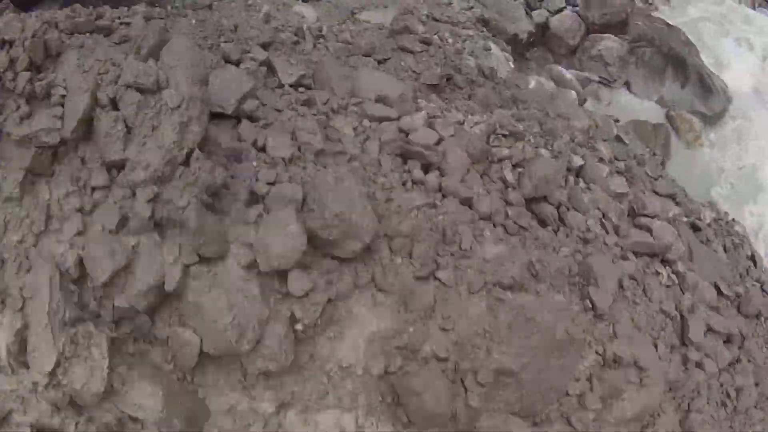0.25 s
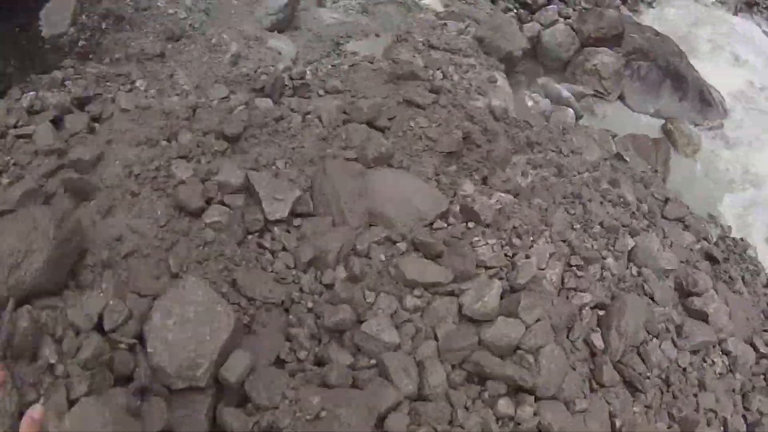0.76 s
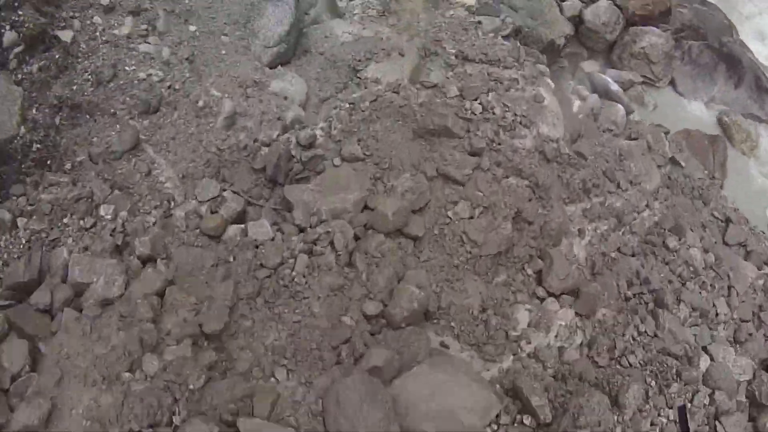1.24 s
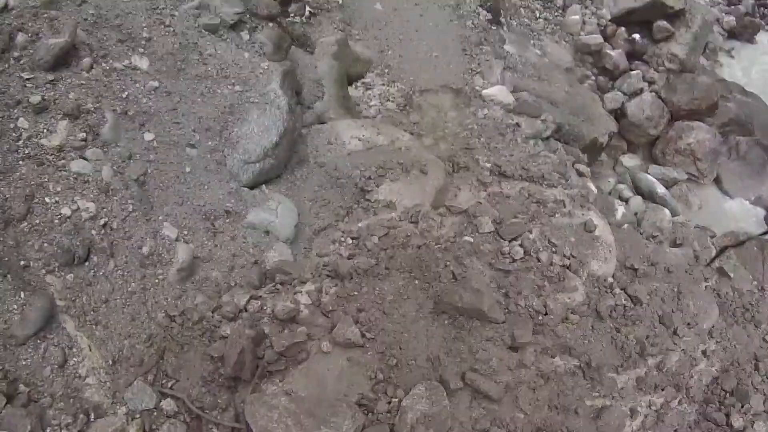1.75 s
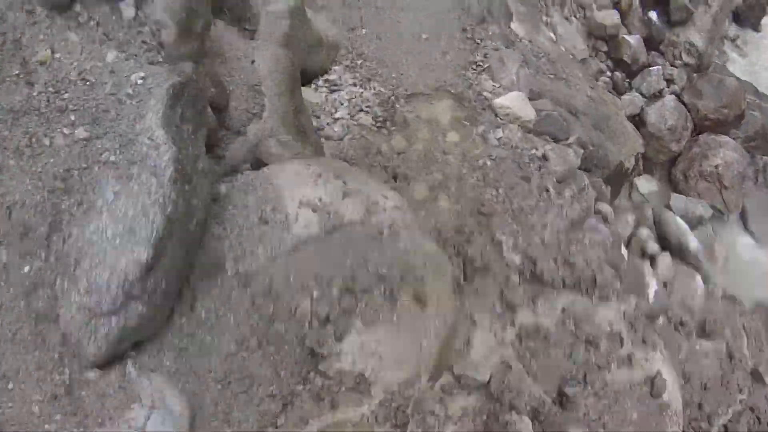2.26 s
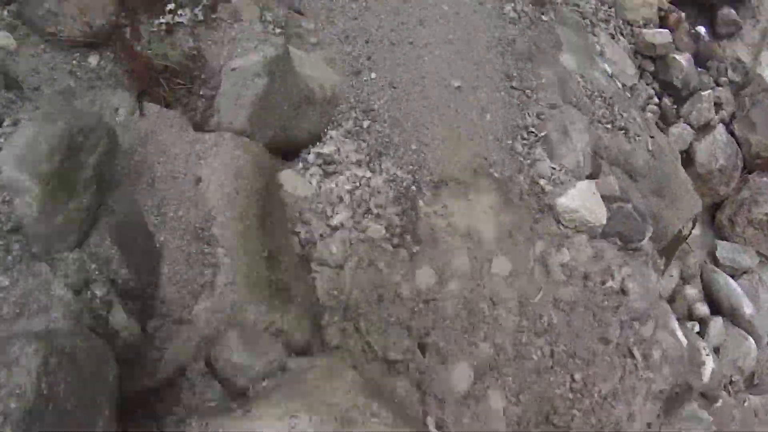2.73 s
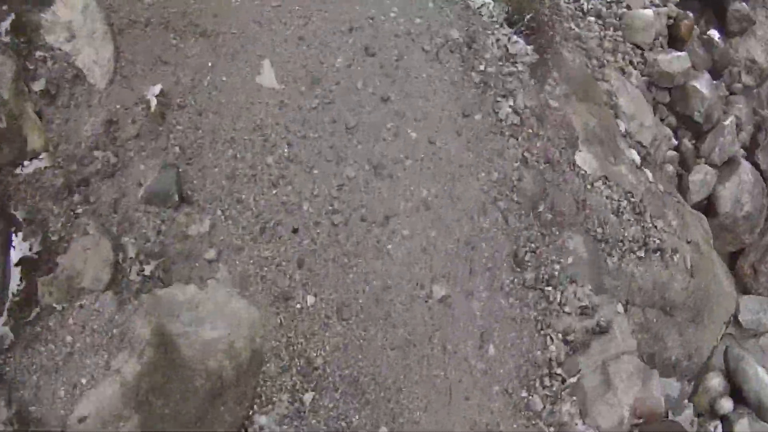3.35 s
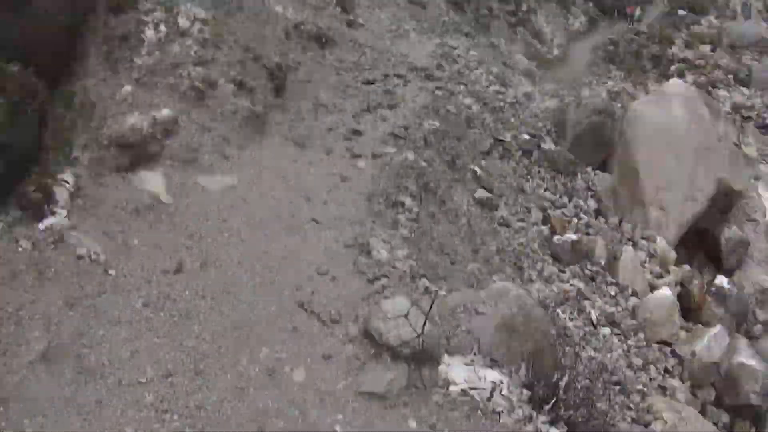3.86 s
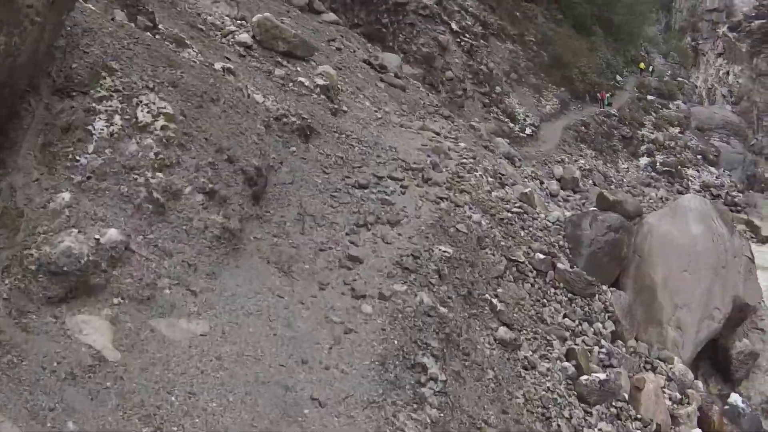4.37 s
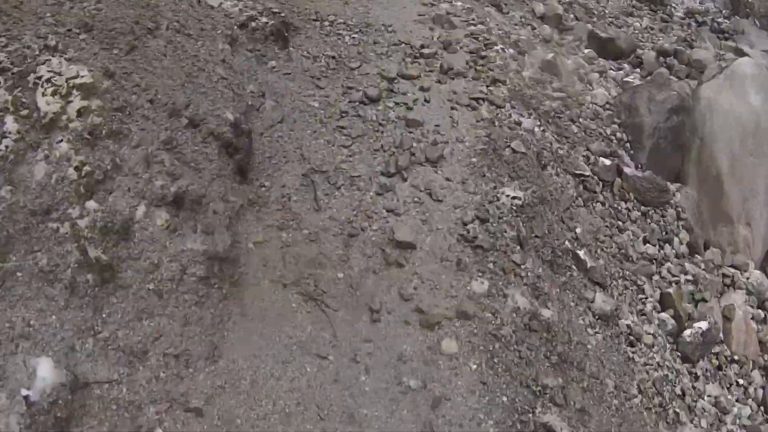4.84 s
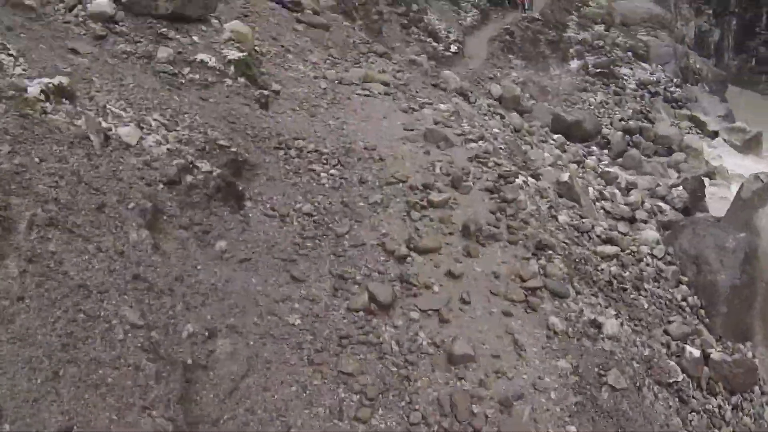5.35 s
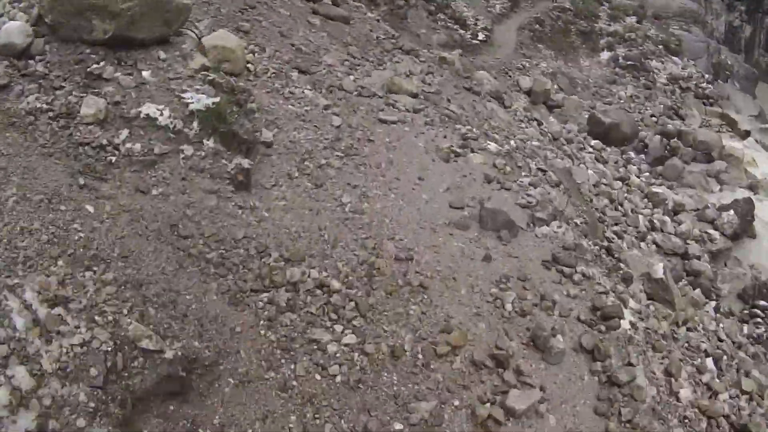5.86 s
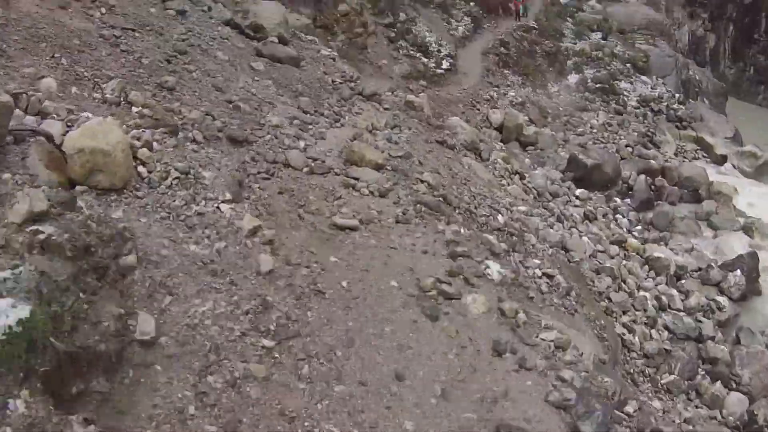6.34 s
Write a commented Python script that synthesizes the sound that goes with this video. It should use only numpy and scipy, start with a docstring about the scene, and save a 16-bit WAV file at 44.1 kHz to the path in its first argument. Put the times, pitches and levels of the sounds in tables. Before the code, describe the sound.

Boots crunch over loose scree beside a steadily rushing river, while a body-worn camera rumbles, thumps and clacks hard with the jolting stride.

```python
"""Walking on scree above a river

A walker crosses loose scree above a rushing river, with a small cased camera worn on the body.
The river is coloured noise with splashes; steps are showers of tiny gravel impacts, and stones ring and crack.
The stride jolts the camera: it rumbles, thumps with low pulses, thuds dully and clacks in its mount.
The hardest jolts, in two groups, drive the limiter, so the river ducks and swells back."""
import sys
import numpy as np
from scipy import signal
from scipy.fft import rfft, irfft
from scipy.io import wavfile
from scipy.ndimage import uniform_filter1d, minimum_filter1d

SR = 44100
rng = np.random.default_rng(int(sys.argv[2]) if len(sys.argv) > 2 else 0)


def master(y):
    """Save y as 16-bit WAV."""
    cut = np.clip(np.atleast_2d(y).T, -1, 1)
    pcm = np.round(cut * 32767)  # scale
    wavfile.write(sys.argv[1], SR, pcm.astype(np.int16))


N = 291060
TIME = np.arange(N) / SR


def undb(db):
    """Turn decibels into a gain."""
    return 10 ** (np.asarray(db) / 20)


def unit(x):
    """Scale to an rms of one."""
    return x / np.sqrt(np.mean(x ** 2))


def peaked(x):
    """Scale to a peak of one."""
    return x / np.max(np.abs(x))


def add(out, s, sound):
    """Mix a sound in at time s (seconds)."""
    start = int(np.clip(s * SR, 0, N - 1))
    out[start:start + len(sound)] += sound[:N - start]


def colour(x, points):
    """Filter through (Hz, dB) points without sounding early; white noise keeps its power."""
    size = 16384
    hz, db = np.transpose(points)
    bins_hz = np.fft.rfftfreq(size, 1 / SR)
    log_gain = np.log(undb(np.interp(np.log(bins_hz + 1), np.log(hz), db)))
    # fold the cepstrum: all of the filter's response then comes after its input
    cepstrum = irfft(log_gain)
    cepstrum[1:size // 2] *= 2
    cepstrum[size // 2 + 1:] = 0
    response = irfft(np.exp(rfft(cepstrum)))
    return signal.fftconvolve(x, response / np.linalg.norm(response))[:len(x)]


def walk(rate):
    """Wander at random with an rms of one: rate new levels a second, smoothed twice."""
    k = int(SR / rate)
    steps = np.repeat(rng.standard_normal(N // k + 1), k)
    return unit(uniform_filter1d(uniform_filter1d(steps, k), k)[:N])


def grains(rate, spread_db):
    """Scatter tiny impacts at random, rate a second, mostly small and a few large."""
    chance, sign = rng.random(N), rng.choice([-1, 1], N)
    size = undb(spread_db * np.minimum(rng.exponential(size=N), 4))
    return unit((chance < rate / SR) * sign * size)


def swells(table):
    """Level of bell-shaped bursts given as (middle s, length s, dB), added as powers."""
    power = 0
    for s, length, db in table:
        power = power + undb(db) ** 2 * np.exp(-np.pi * ((TIME - s) / length * np.sqrt(2)) ** 2)
    return np.sqrt(power)


def after_jolts(growth, build_s, fall_s):
    """Level of something stirred by the jolts: it builds up to each one, then dies away."""
    power = 0
    for s, db, _ in JOLTS:
        shape = np.exp(-2 * np.maximum((s - TIME) / build_s, (TIME - s) / fall_s))
        power = power + undb(growth * db) ** 2 * shape
    return np.sqrt(power)


def fade(t60, rise_s):
    """Envelope of a blow: it builds while the contact lasts, then dies away."""
    t = TIME[:SR // 10]
    return peaked((1 - np.exp(-(t / rise_s) ** 2)) * np.exp(-np.log(1000) * t / t60))


def ring(hz, t60, rise_s):
    """One struck tone: a sine that dies away."""
    envelope = fade(t60, rise_s)
    return np.sin(2 * np.pi * hz * TIME[:len(envelope)]) * envelope


def burst(t60, rise_s):
    """Noise that dies away like a blow."""
    envelope = fade(t60, rise_s)
    return rng.standard_normal(len(envelope)) * envelope


# spectrum of the river: f/Hz, relative level/dB per Hz
RIVER_COLOUR = [(60, 8), (200, -3.5), (450, -5.5), (850, -8.5), (1150, -10), (1400, -1.5), (1650, -3),
                (2050, 3.5), (2850, 5.5), (3300, -5), (3950, -7.5), (4450, -7), (7000, -16), (7900, -21),
                (15000, -31.5)]
# the path leads slowly away from the white water: level at the start (dB), its fall (dB per s)
RIVER_DB, RECEDE_DB_PER_S = -46.5, 0.31


def river(surge_db=0.12, flicker_db=-0.9, spray_hz=4300.0, spray_power=1.0):
    """White water: a rush with splashes in it; its high spray fades faster with distance."""
    rush = colour(rng.standard_normal(N), RIVER_COLOUR) * undb(surge_db * walk(2.28))
    splashes = colour(grains(rate=2500, spread_db=2.0), RIVER_COLOUR) * undb(flicker_db * walk(23))
    water = rush + undb(-12.5) * splashes
    near_db = RIVER_DB - RECEDE_DB_PER_S * TIME
    low_pass = signal.butter(2, spray_hz, fs=SR, output="sos")
    roar = signal.sosfiltfilt(low_pass, water)
    spray = (water - roar) * undb(spray_power * (near_db - near_db.mean()))
    return (roar + spray) * undb(near_db)


# spectrum of the camera's sway: f/Hz, relative level/dB per Hz
SWAY_COLOUR = [(12, -4), (25, 9.5), (48, -4.5), (70, -7.5), (100, -32), (150, -36), (300, -44.5),
               (600, -90)]
# level at rest and around a full-scale jolt (dB), and dB of sway for each dB of jolt
SWAY_REST_DB, SWAY_DB, SWAY_GROWTH = -47.5, -20, 0.61
# the sway builds as the body leans into a jolt and dies away after it (s to change by a factor e)
SWAY_BUILD_S, SWAY_FALL_S = 0.029, 0.071
# the body rocks for this long around each footfall (s)
ROCK_S = 0.23


def sway():
    """The stride rocks the camera: a deep rumble that swells around every footfall and jolt."""
    rocking = signal.hilbert(colour(rng.standard_normal(N), SWAY_COLOUR))
    strength = np.sqrt(uniform_filter1d(np.abs(rocking) ** 2, SR // 10))
    steady = unit(rocking.real / strength)  # evened out, so that the levels below shape it
    stride = swells([(s, ROCK_S, db) for s, _, _, _, db in STEPS])
    shaken = undb(SWAY_DB) * after_jolts(SWAY_GROWTH, SWAY_BUILD_S, SWAY_FALL_S)
    return steady * np.sqrt(undb(SWAY_REST_DB) ** 2 + stride ** 2 + shaken ** 2)


# jolts of the camera: t/s, peak level of the shove/dB, basic f/Hz (before the strap and stop speeds)
JOLTS = [(.007, -8.5, 44), (0.041, -18.5, 72), (0.078, -13.5, 66), (.146, -16.5, 62.4), (.23, -16, 45),
         (.577, -6.5, 53), (.591, -14, 62), (1.119, -24.5, 46), (1.405, -13, 44.3), (1.446, -13, 45),
         (1.68, -13.5, 40.6), (1.717, -12.5, 70), (1.861, -23, 45.8), (2.265, 6, 69), (2.288, 4.5, 58.7),
         (2.77, -19, 48), (2.948, -6, 60.6), (3.22, -29.5, 49.7), (3.627, -6, 45.7), (3.671, 3, 66),
         (3.865, -8.5, 55.5), (4.62, -31.5, 44.8), (5.189, -27.5, 38.7), (5.311, -24.5, 40),
         (5.353, -26, 52), (5.68, -21, 47.7), (6.014, -21, 38.3), (6.323, -23.5, 47)]


def jolts(mount_hz=52, mount_t60=0.16, wobble_db=-12, stop_share=0.32, stop_db=-1,
          stop_speed=1.49, strap_speed=0.8):
    """Each jolt shoves the camera out and back; the microphone feels the acceleration, then the mount wobbles."""
    shove = np.zeros(N)
    for s, db, hz in JOLTS:
        # a harder jolt puts more, up to a limit, on the stiff stop behind the soft strap
        hard = stop_share * min(1, undb(db - stop_db))
        for share, speed in ((1 - hard, strap_speed), (hard, stop_speed)):
            u = (np.pi * hz * speed * (TIME - s)) ** 2
            near = u < 20
            # acceleration of a bell-shaped movement
            shove[near] += undb(db) * share * (2 * u[near] - 1) * np.exp(-u[near])
    t = TIME[:SR // 2]
    decay = np.exp(-np.log(1000) * t / mount_t60)
    mount = 2 * np.cos(2 * np.pi * mount_hz * t) * decay / decay.sum()
    wobble = signal.fftconvolve(shove, mount)[:N]
    return shove + undb(wobble_db) * wobble


# spectrum of the dull thud: f/Hz, relative level/dB per Hz
THUD_COLOUR = [(60, -18.5), (140, -5), (215, 6.5), (280, 1.5), (350, -4), (500, -11), (1000, -48)]


def thuds(thud_db=-33, thud_t60=0.14, lead_s=0.0087, growth=2.14):
    """Hard jolts shudder through straps and clothing as a dying thud; the padding passes only so much."""
    shudder = np.zeros(N)
    t = TIME[:SR // 3]
    for s, db, _ in JOLTS:
        strength = np.tanh(undb(growth * db))  # levels off for the hardest jolts
        add(shudder, s - lead_s, strength * np.exp(-np.log(1000) * t / thud_t60))
    return undb(thud_db) * colour(shudder * rng.standard_normal(N), THUD_COLOUR)


# a boot landing on or pushing off the scree: t/s (full weight), length of the roll/s,
# small gravel level/dB, coarse rubble level/dB, camera sway level/dB
STEPS = [(.085, 0.16, -47, -46, -22.5), (.55, 0.15, -49.5, -61, -30.5), (1.08, 0.1, -45.5, -53.5, -40.5),
         (1.24, 0.038, -53, -51, -43), (1.405, 0.13, -45.5, -55, -28), (1.845, 0.12, -44, -49.5, -28.5),
         (2.20, 0.095, -52, -53.5, -36.5), (2.39, 0.072, -61, -51, -28),
         (2.901, 0.061, -46.5, -47.5, -25.5), (3.03, 0.17, -50.5, -67, -30.5),
         (3.63, .045, -44, -42.5, -43), (3.76, 0.18, -61, -48.5, -34), (4.137, 0.19, -49.5, -53, -51),
         (4.345, 0.059, -46, -60, -41), (4.90, 0.28, -54, -55, -46), (5.30, 0.29, -50, -57.5, -37.5),
         (5.76, 0.31, -50, -53.5, -39), (6.01, 0.14, -49.5, -56, -36), (6.44, 0.17, -43.5, -49.5, -34)]
# a sole sliding on fine grit: t/s (middle), length/s, level/dB
SCUFFS = [(.525, .021, -47), (.585, .028, -56), (1.22, .05, -55), (1.83, .07, -61), (2.238, .03, -62),
          (2.91, 0.023, -53), (3.612, 0.02, -46.5), (5.96, 0.019, -49.5), (6.295, .031, -52),
          (6.46, .12, -63)]
# spectra of small gravel, coarse rubble and fine grit: f/Hz, relative level/dB per Hz
GRAVEL_COLOUR = [(300, -17.5), (1150, -17.5), (1420, -12.5), (1680, -8), (2080, -3), (2350, -1.5),
                 (2700, -1), (2950, 5), (3250, -3.5), (3650, -4.5), (4000, -15), (6500, -25), (7400, -29.5),
                 (14000, -45)]
RUBBLE_COLOUR = [(200, -0.5), (550, -11), (900, -10.5), (1200, -3.5), (1420, 5.5), (1680, -9.5),
                 (2080, 5.5), (2350, -2), (2900, -10.5), (3900, -14), (7000, -32), (14000, -64)]
GRIT_COLOUR = [(1000, 0.5), (2500, 2), (4000, 9.5), (7000, 2.5), (8500, -2), (12000, -12.5), (15000, -32)]
# rubble tumbling around a jolt: level at a full-scale jolt (dB), build and fall (s)
TUMBLE_DB, TUMBLE_BUILD_S, TUMBLE_FALL_S = -52, .01, 0.091
# grit hiss under a rolling sole, relative to its gravel (dB)
ROLL_GRIT_DB = -18.5


def footsteps(slip_db=2.0, tumble_db=-1.0, uneven_db=1.0):
    """Scree slips in a dense shower of gravel, sparser knocks of rubble that tumble on, and hissing grit."""
    middle, length, gravel_db, rubble_db, _ = np.transpose(STEPS)
    roll = swells(zip(middle, length, gravel_db)) * undb(uneven_db * walk(25))
    gravel = grains(rate=1800, spread_db=1.0) * roll * undb(slip_db * walk(130))

    tumbling = undb(TUMBLE_DB) * after_jolts(0.83, TUMBLE_BUILD_S, TUMBLE_FALL_S)
    rubble_level = np.hypot(swells(zip(middle, length, rubble_db)), tumbling)
    rubble = grains(rate=830, spread_db=1.5) * rubble_level * undb(tumble_db * walk(90))

    # grit is too fine for single grains to be heard, so it is plain noise
    scuff = rng.standard_normal(N) * np.hypot(swells(SCUFFS), undb(ROLL_GRIT_DB) * roll)
    return colour(gravel, GRAVEL_COLOUR) + colour(rubble, RUBBLE_COLOUR) + colour(scuff, GRIT_COLOUR)


# stones striking each other: t/s, crack level/dB, ring f/Hz, bright snap level/dB relative to the crack
STONES = [(0.043, -31, 1280, -15), (.141, -34.5, 1310, -16), (.5645, -31.5, 1450, -16),
          (1.295, -32.5, 1370, -11), (1.4242, -29, 1440, -12), (1.877, -32, 1460, -14),
          (2.932, -28, 1500, -22), (2.9842, -35.5, 1500, -20), (3.841, -30, 1420, -24),
          (4.9412, -29, 2240, -20), (5.611, -29.5, 2300, 11)]
# spectrum of a stone's crack: f as a multiple of its ring, relative level/dB per Hz
CRACK_COLOUR = [(.15, -5), (.45, -14), (.7, -0.5), (1, 5.5), (1.4, -2), (2.1, -6), (3.2, -19.5), (8, -42)]


def stones(ring_t60=0.036, ring_db=-8, contact_s=0.0012):
    """Stone on stone: a short dry ring in a rough crack of matching pitch, with a bright snap at its start."""
    out = np.zeros(N)
    for s, db, hz, snap_db in STONES:
        crack_points = [(hz * multiple, crack_db) for multiple, crack_db in CRACK_COLOUR]
        crack = colour(burst(t60=0.01, rise_s=contact_s), crack_points)
        snap = colour(burst(t60=0.0075, rise_s=contact_s / 2), GRIT_COLOUR)
        tone = undb(ring_db) * ring(hz, ring_t60, contact_s)
        add(out, s, undb(db) * peaked(peaked(crack) + tone + undb(snap_db) * peaked(snap)))
    return out


# the case knocking in its mount: t/s, level of the ringing walls/dB, hollow body level/dB relative to them
CLACKS = [(.565, -37, 2), (1.708, -38.5, 12), (2.2577, -15.5, -18), (2.2647, -19.5, 6.5),
          (2.2800, -24.5, 4.5), (2.9407, -21.5, -1), (3.6290, -14, -6), (3.6429, -24, -7),
          (3.6490, -19.5, -4.5), (3.6640, -16, -6.5), (3.844, -44, 13)]
# what the case walls ring with: f/Hz (before a small random shift), t60/s (time to fall 60 dB), level/dB
CASE_MODES = [(1520, .008, -8), (2190, .009, -4), (2410, .007, 0), (3100, .008, -13), (3600, .005, -18),
              (4400, .006, -21)]
# spectrum of the dry tick of plastic on plastic: f/Hz, relative level/dB per Hz
TICK_COLOUR = [(300, 1), (3000, 3), (4600, -3), (6500, -14.5), (14000, -31)]


def clacks(body_hz=265, body_t60=0.0087, detune=0.025, rattle_db=-20, tick_db=-15, contact_s=0.00049):
    """The plastic case strikes its mount: a dry tick, a hollow knock, ringing walls and a brief rattle."""
    out = np.zeros(N)
    for s, db, body_db in CLACKS:
        shifts = 1 + detune * rng.standard_normal(len(CASE_MODES))
        walls = 0
        for (hz, t60, mode_db), shift in zip(CASE_MODES, shifts):
            walls = walls + undb(mode_db) * ring(hz * shift, t60, contact_s)
        body = undb(body_db) * ring(body_hz, body_t60, contact_s)
        tick = undb(tick_db) * peaked(colour(burst(t60=0.0086, rise_s=contact_s), TICK_COLOUR))
        rattle = undb(rattle_db) * peaked(colour(burst(t60=0.037, rise_s=contact_s), RUBBLE_COLOUR))
        add(out, s, undb(db) * (peaked(walls) + body + tick + rattle))
    return out


def scene():
    """River, boots and camera noises at one microphone."""
    return (river() + sway() + jolts() + thuds() + footsteps() + stones() + clacks())[None]


# ripple of the case's cavity in front of the microphone: f/Hz, relative level/dB
CAVITY_COLOUR = [(1700, 1), (2000, 1.5), (2300, -2.5), (2520, 1.5), (2730, -5), (2900, 0.6), (3100, -0.5),
                 (3700, 0), (3930, -2), (4200, 0.5)]
TOP_HZ = 14900  # nearly nothing passes well above this


def record(dry, ceiling_db=0., hold_s=0.23, release_db_per_s=27):
    """The case colours the sound; a look-ahead limiter ducks it at peaks and recovers slowly; the top is cut."""
    heard = colour(dry[0], CAVITY_COLOUR)
    over_db = np.maximum(20 * np.log10(np.abs(heard) + 1e-9) - ceiling_db, 0)
    hold = int(hold_s * SR) // 2
    ahead = int(.004 * SR)
    held_db = -minimum_filter1d(-over_db, 2 * hold + 1, origin=hold, mode="constant")
    # after the hold, the cut shrinks at a steady rate
    release_db = release_db_per_s * TIME
    cut_db = np.maximum.accumulate(held_db + release_db) - release_db
    cut_db = -minimum_filter1d(-cut_db, ahead)  # the gain starts down just before the peak
    cut_db = uniform_filter1d(uniform_filter1d(cut_db, ahead), ahead)
    low_pass = signal.ellip(8, .2, 80, TOP_HZ, fs=SR, output="sos")
    return signal.sosfilt(low_pass, heard * undb(-cut_db))[None]


dry = scene()
out = record(dry)
master(out)
```